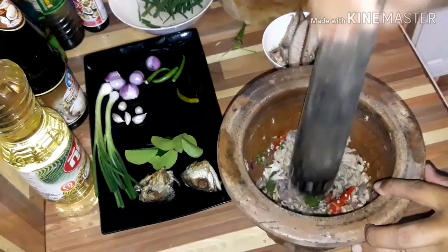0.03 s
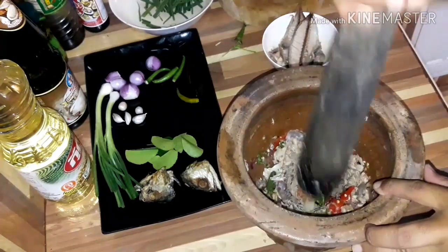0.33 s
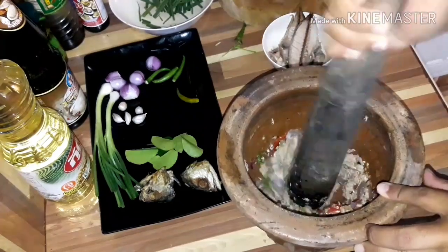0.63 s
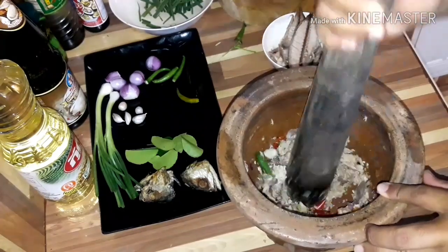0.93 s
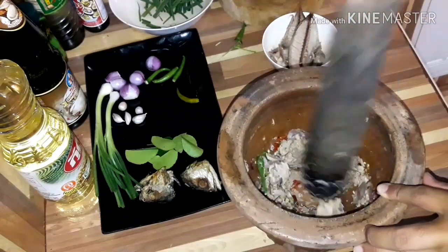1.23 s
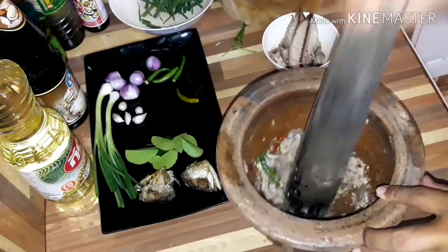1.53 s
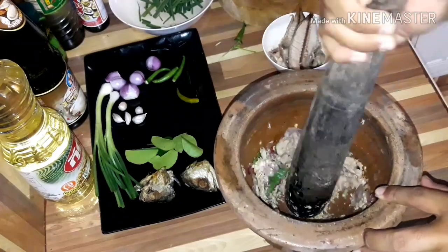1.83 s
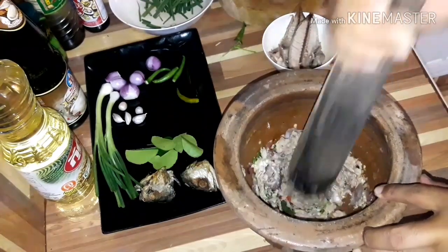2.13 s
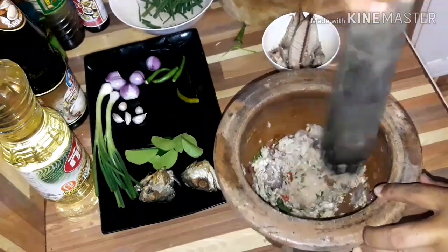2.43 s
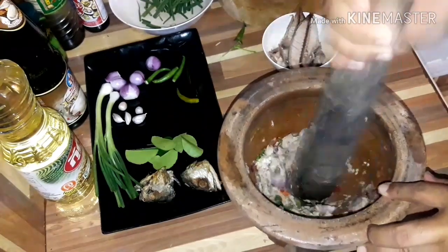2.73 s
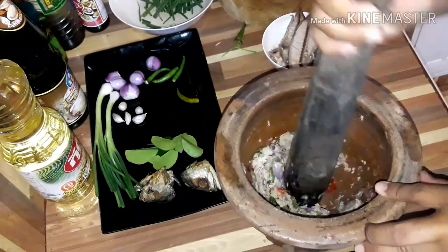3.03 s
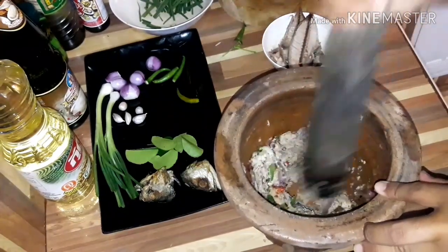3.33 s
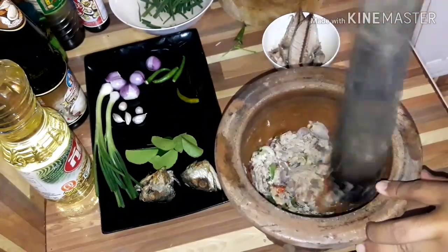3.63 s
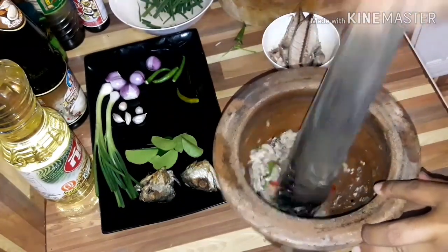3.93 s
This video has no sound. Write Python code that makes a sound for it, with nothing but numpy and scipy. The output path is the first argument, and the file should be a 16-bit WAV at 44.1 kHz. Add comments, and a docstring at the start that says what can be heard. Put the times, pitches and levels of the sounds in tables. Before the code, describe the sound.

Close, uneven thuds and knocks of a heavy pestle crushing food in a clay mortar.

```python
"""A soft knock and a crunch, close by: a heavy pestle pounds garlic and chilli in a clay mortar on a
wooden table, about four strokes a second. Some strokes knock on the clay wall and slide down to thud
on the bottom; others land softly in the food, which crunches and plops. A low boom rings on between
the strokes, and the hard-walled kitchen answers each one. Heard at one microphone, through a limiter."""
import sys
import numpy as np
from scipy import signal
from scipy.fft import rfft, irfft
from scipy.io import wavfile

SR = 44100
rng = np.random.default_rng(int(sys.argv[2]) if len(sys.argv) > 2 else 0)


def waveform_to_disk(signal):
    """Save audio, clipped to [-1, 1], as 16-bit WAV at the path in sys.argv[1]."""
    frames = np.transpose(np.atleast_2d(signal))
    scaled = np.clip(frames, -1, 1) * 32767
    samples = np.round(scaled).astype(np.int16)
    wavfile.write(sys.argv[1], SR, samples)


N = 176400
T = np.arange(N) / SR


def from_db(db):
    """Decibels to gain."""
    return 10 ** (np.asarray(db) / 20)


def rms_one(x):
    """Scale to rms 1."""
    return x / np.sqrt(np.mean(x ** 2) + 1e-20)


def at_hz(points, hz):
    """Read a table on a log-frequency axis."""
    points_hz, values = np.transpose(points)
    return np.interp(np.log(np.maximum(hz, 1)), np.log(points_hz), values)


def coloured(x, spectrum):
    """Give a steady signal a spectrum, at rms 1."""
    gain = from_db(at_hz(spectrum, np.fft.rfftfreq(len(x), 1 / SR)))
    return rms_one(irfft(rfft(x) * gain, len(x)))


def even_noise(blocks, size):
    """Noise whose every block holds all pitches equally."""
    flat_spectra = np.exp(2j * np.pi * rng.random((blocks, size // 2 + 1)))
    return rms_one(irfft(flat_spectra, size).ravel())


def add(out, start_s, sound):
    """Mix a sound in at a time."""
    i = max(int(start_s * SR), 0)
    out[i:i + len(sound)] += sound[:max(N - i, 0)]


def dying(t, t60):
    """Exponential decay, 60 dB down at t60."""
    return np.exp(-np.log(1000) * t / t60)


# Pestle blows, close to the microphone: start_s, thud_db, knock_db, clack_db, clay_pitch_ratio
BLOWS = [(0.0, -23.5, -32.5, -38.5, 0.96), (0.2135, -7.5, -8.5, -3, .95), (0.448, -35, -32, -61, 0.94),
         (0.714, -27, -78, -66, 0.87), (0.936, -7.5, -10, -13.5, 0.88), (1.012, -16.5, -22, -24.5, 0.91),
         (1.183, -13, -22.5, -24, 1.04), (1.3691, -11.5, -11, -4, 1.026), (1.394, -24, -10.5, -15, 1.06),
         (1.606, -19, -16, -9, 1.0), (1.640, -25, -11, -29, 1.07), (2.32, -29.5, -36.5, -74, 0.68),
         (2.5225, -8.5, -7, -19.5, 1.01), (2.547, -11, -18, -36, 1.0), (2.7709, -11, -7, -11.5, 0.98),
         (2.9829, -16.5, -12, -25, 1.01), (3.046, -14.5, -11.5, -21.5, 1.0),
         (3.2364, -12.5, -12.5, -16, 0.98), (3.296, -11, -11, -25.5, 1.0), (3.4719, -13, -11, -7, 0.99),
         (3.549, -18, -27.5, -35, 1.08), (3.7205, -12.5, -9.5, -15, 1.006), (3.789, -16.5, -13, -27, 1.015),
         (3.9788, -15.5, -11, -5.5, 1.0)]
# Modes of the mortar and the table under it: pitch_hz, relative_db, t60_s
BODY_MODES = [(188, -2.5, 0.11), (255, -1.5, 0.042), (331.5, -2, 0.065), (507, 0.5, 0.039),
              (581, -0.5, 0.067), (722.6, 0.5, 0.033), (948.5, -0.5, 0.053), (1051, 0, 0.064),
              (1401, 2, 0.026), (1627, 2, 0.018), (1953, -5, 0.01), (2404, -5, 0.02), (3462, -23.5, 0.028),
              (4095, -20.5, 0.017), (6060, -37.5, 0.033)]
# Spectrum of the brief crack of contact: frequency_hz, relative_db
TICK_COLOUR = [(300, -23), (1500, 8), (2600, 1), (4300, 2.5), (6000, -6), (8500, -8), (10500, -18),
               (15000, -24)]
def pestle():
    """Each blow rings the modes of mortar and table; harder contact adds clack and a tick."""
    contact_s, tick_s, tick_db = 0.00018, 0.0041, -18
    clay_above_hz = 800   # higher modes belong to the clay wall and shift with the spot struck
    out, t = np.zeros(N), T[:SR // 3]
    for start_s, thud_db, knock_db, clack_db, clay_pitch in BLOWS:
        force_spectrum = [(306, thud_db), (560, knock_db), (926, knock_db), (1414, clack_db)]
        ring = 0
        for k, (hz, db, t60) in enumerate(BODY_MODES):
            wander = 1 + 0.015 * rng.normal()   # each blow lands elsewhere
            shift = wander * (clay_pitch if hz > clay_above_hz else 1)
            strength = from_db(db + at_hz(force_spectrum, hz) + 2 * rng.normal())
            ring += (-1) ** k * strength * dying(t, t60) * np.sin(2 * np.pi * hz * shift * t)
        tick_noise = coloured(rng.standard_normal(len(t)), TICK_COLOUR)
        tick = from_db(clack_db + tick_db) * np.exp(-t / tick_s) * tick_noise
        add(out, start_s, (ring + tick) * (1 - np.exp(-t / contact_s)))
    # Mortar and table radiate little deep bass.
    return signal.sosfilt(signal.butter(4, 139, "high", fs=SR, output="sos"), out)


# Garlic and chilli crushed in the mortar, close by: peak_s, relative_db, rise_s, fall_s
CRUNCHES = [(0.0, -36, 0.0066, 0.026), (0.214, -27, 0.0049, 0.0052), (0.448, -28, 0.0013, 0.008),
            (0.462, -49, .004, 0.004), (0.682, -44.5, .006, 0.013), (0.712, -34, 0.01, 0.003),
            (0.910, -27, 0.0059, 0.0054), (0.934, -26, 0.0015, 0.0018), (0.938, -15, 0.0037, 0.0035),
            (1.133, -30, 0.0053, 0.0082), (1.186, -22, 0.013, 0.0018), (1.3718, -17.5, 0.00028, 0.0037),
            (1.400, -48, 0.0066, .005), (1.412, -32.5, 0.0018, 0.0015), (1.645, -36, 0.01, 0.0049),
            (1.845, -45, 0.0038, 0.0079), (1.87, -37, 0.013, 0.0044), (2.081, -43.5, 0.0014, 0.016),
            (2.104, -39, 0.0087, 0.0037), (2.183, -50, 0.0069, 0.0066), (2.304, -41, .002, 0.021),
            (2.341, -37.5, 0.021, .014), (2.427, -39.5, 0.018, 0.017), (2.523, -34.5, 0.00084, 0.0046),
            (2.548, -24, 0.0031, 0.0028), (2.571, -30, 0.0038, .004), (2.582, -27.5, 0.0046, 0.0055),
            (2.819, -27.5, 0.0096, 0.0023), (2.984, -39.5, .001, 0.0095), (3.046, -40, 0.0028, 0.012),
            (3.067, -23, 0.0019, 0.0018), (3.298, -28, 0.009, 0.009), (3.313, -36, 0.0051, 0.0026),
            (3.548, -30.5, .012, 0.0026), (3.748, -38, .003, 0.0061), (3.790, -28.5, 0.0091, 0.0027)]
# Spectrum of the crunch: frequency_hz, relative_db
CRUNCH_COLOUR = [(150, 24), (400, 7), (750, 10.5), (1200, 4), (1800, 5.5), (3000, 3), (5000, 0.5),
                 (8300, 2), (10500, -11), (15000, -23)]
def crunch():
    """Fibres snap in a shower that builds up under the pestle and stops as it bottoms out."""
    band_snaps_per_s, spread_db, gain_db = 2200, 3.5, 3
    power, snaps = 0, 0
    for peak_s, db, rise_s, fall_s in CRUNCHES:
        from_peak = np.where(T < peak_s, (peak_s - T) / rise_s, (T - peak_s) / fall_s)
        power += from_db(db) ** 2 * np.exp(-2 * from_peak)
    edges_hz = np.geomspace(150, 18000, 15)   # half-octave bands, each with its own snaps
    for band_hz in zip(edges_hz, edges_hz[1:]):
        clicks = (rng.random(N) < band_snaps_per_s / SR) * rng.choice([-1, 1], N)
        strength = from_db(spread_db * np.minimum(rng.exponential(1, N), 4))
        bandpass = signal.butter(2, band_hz, "band", fs=SR, output="sos")
        snaps += signal.sosfilt(bandpass, clicks * strength + 1e-18)
    return from_db(gain_db) * np.sqrt(power) * coloured(snaps, CRUNCH_COLOUR)


# Swells of the low boom at the microphone: time_s, relative_db
BOOM_LEVEL = [(0.0, -41), (0.49, -36.5), (0.83, -42), (0.99, -26.5), (1.1, -32.5), (1.35, -30), (1.39, -36),
              (1.45, -36.5), (1.63, -46), (1.7, -41.5), (2.26, -41.5), (2.41, -29.5), (2.52, -35),
              (2.7, -33), (2.8, -47), (2.88, -37.5), (3.29, -33), (3.5, -40.5), (3.58, -36), (3.73, -43),
              (3.92, -37), (4.0, -39)]
# Its note: time_s, pitch_hz
BOOM_PITCH = [(0, 104.3), (2.78, 104.3), (2.88, 103.0), (4, 103.0)]
def boom(gain_db=3.5):
    """One low note that swells and sinks but never dies away between the strokes."""
    hz = np.interp(T, *np.transpose(BOOM_PITCH))
    db = np.interp(T, *np.transpose(BOOM_LEVEL))
    return from_db(db + gain_db) * np.sqrt(2) * np.sin(2 * np.pi * np.cumsum(hz) / SR)


# Background of the kitchen: frequency_hz, relative_db
ROOM_TONE_COLOUR = [(25, 1), (48, -3), (70, 5), (150, 2), (300, 0.5), (700, -2.5), (1500, -6.5),
                    (3000, -17), (8000, -30.5), (11000, -39), (16000, -44)]
def room_tone(level_db=-47.5):
    """A faint, steady noise, mostly low, lies under the pounding."""
    return from_db(level_db) * coloured(rng.standard_normal(N), ROOM_TONE_COLOUR)


# Decay between the hard walls: frequency_hz, t60_s
ROOM_T60 = [(100, 0.23), (300, 0.51), (700, 0.44), (1800, 0.44), (5000, 0.48), (9000, 0.47), (15000, 0.24)]
# Colour of that decay: frequency_hz, relative_db
ROOM_COLOUR = [(100, 5), (250, 0), (700, 0.5), (1500, 1.5), (3000, -4), (8000, -5.5), (15000, -1.5)]
# Notes that linger in the room: pitch_hz, gain_db, t60_s
ROOM_MODES = [(197.8, 6.5, 0.72), (233.7, -22, .4), (321.5, 5, 0.55), (366.7, 3, 1), (521.6, 5, 0.25),
              (568.6, 4, 0.37), (690, -18, 0.94)]
def kitchen(direct):
    """The walls return early reflections, a tail that dies band by band, and a few lingering notes."""
    first_echo_s, early_db, early_s = 0.0057, -17, 0.015
    echoes = even_noise(blocks=36, size=1024)
    t, hz = T[:len(echoes)], np.fft.rfftfreq(len(echoes), 1 / SR)
    spectrum = rfft(echoes) * from_db(at_hz(ROOM_COLOUR, hz))
    arrival = np.clip(t / first_echo_s - 0.5, 0, 1)
    early = from_db(early_db) * np.exp(-t / early_s)
    centres_hz, t60s = np.transpose(ROOM_T60)
    response = 0
    for t60, share in zip(t60s, np.eye(len(t60s))):
        band = irfft(spectrum * at_hz(np.c_[centres_hz, share], hz))
        envelope = arrival * (dying(t, t60) + early)
        response += band * envelope / np.sqrt(np.sum(envelope ** 2))
    for note_hz, db, t60 in ROOM_MODES:
        unity_gain = 2 * np.log(1000) / (t60 * SR)   # at resonance
        response += from_db(db) * unity_gain * dying(t, t60) * np.cos(2 * np.pi * note_hz * t)
    return signal.fftconvolve(direct, response)[:N]


# Air pockets popping out of the wet paste, close by: start_s, level_db, start_pitch_hz
PLOPS = [(0.922, -8.5, 660), (1.136, -5.5, 608), (1.158, -2, 586), (1.190, -11, 665), (2.122, -30, 680),
         (3.058, -5.5, 628), (3.778, -24, 690)]
def plops():
    """Each air pocket rings briefly, rising in pitch as it closes."""
    rise_s, t60_s, glide_per_s = 0.0011, 0.03, 6
    out, t = np.zeros(N), T[:SR // 5]
    envelope = (1 - np.exp(-t / rise_s)) * dying(t, t60_s)
    for start_s, db, hz in PLOPS:
        cycles = hz * t * (1 + glide_per_s * t / 2)
        add(out, start_s, from_db(db) * envelope * np.sin(2 * np.pi * cycles))
    return out


# Blows on bare clay that leave the bowl singing faintly: start_s, strength_db
BARE_CLAY_BLOWS = [(1.371, -4), (1.607, -9), (2.524, -9.5), (2.771, -7), (2.985, -15.5), (3.237, -9.5),
                   (3.473, -7), (3.720, -11), (3.980, -5)]
# Long-lived modes of the bowl: pitch_hz, relative_db, t60_s
BOWL_MODES = [(980, -23, 0.97), (1413, -12, 0.69), (1431, -11, 0.23), (1690, -20, 0.12), (2500, -31, 0.34)]
def bowl_ring():
    """Close modes of the clay wall beat against each other as they fade."""
    out, t = np.zeros(N), T[:SR // 2]
    fade_in = (1 - np.exp(-t / 0.003)) ** 2   # 3 ms, so the ring starts softly, without a click
    for start_s, strength_db in BARE_CLAY_BLOWS:
        ring = 0
        for hz, db, t60 in BOWL_MODES:
            phase = rng.uniform(0, 2 * np.pi)
            ring += from_db(db) * dying(t, t60) * np.sin(2 * np.pi * hz * t + phase)
        add(out, start_s, from_db(strength_db) * fade_in * ring)
    return out


def scene():
    """One microphone near the mortar, with the kitchen around it."""
    near = pestle() + crunch() + plops()
    return (near + kitchen(near) + bowl_ring() + boom() + room_tone())[None]


def record(dry):
    """The recorder's limiter ducks at loud knocks, overshoots flatten, and the top treble is cut."""
    limit_db, look_ahead_s, attack_s, release_db_per_s = -2, 0.001, 0.0028, 144
    ceiling, knee, cutoff_hz = 1.2, 8, 15800
    ahead = np.interp(T + look_ahead_s, T, dry[0])
    over_db = np.maximum(20 * np.log10(np.abs(ahead) + 1e-9) - limit_db, 0)
    duck_db = np.maximum.accumulate(over_db + release_db_per_s * T) - release_db_per_s * T
    pole = np.exp(-1 / (attack_s * SR))
    limited = dry * from_db(-signal.lfilter([1 - pole], [1, -pole], duck_db))
    flattened = limited / (1 + np.abs(limited / ceiling) ** knee) ** (1 / knee)
    return signal.sosfilt(signal.ellip(10, 0.1, 90, cutoff_hz, fs=SR, output="sos"), flattened)


dry = scene()
out = record(dry)
waveform_to_disk(out)
```